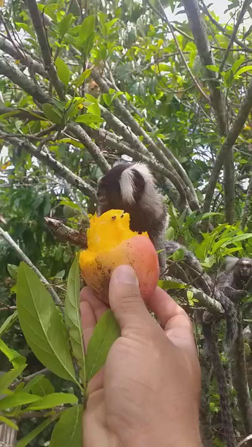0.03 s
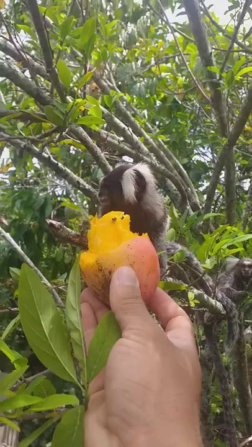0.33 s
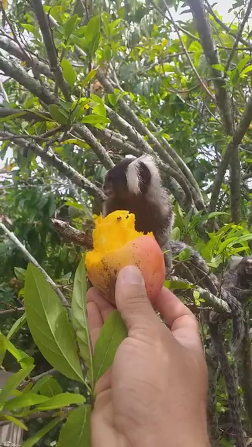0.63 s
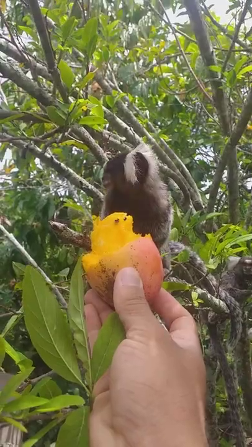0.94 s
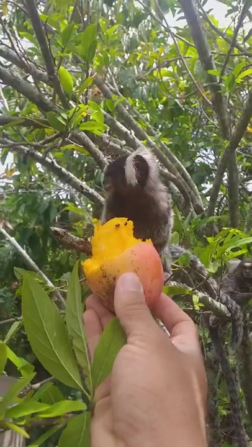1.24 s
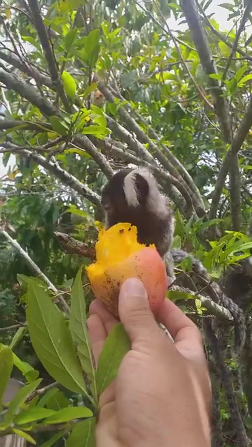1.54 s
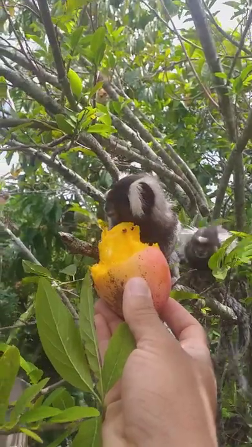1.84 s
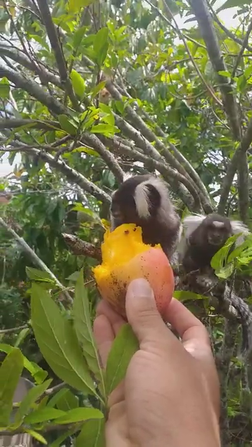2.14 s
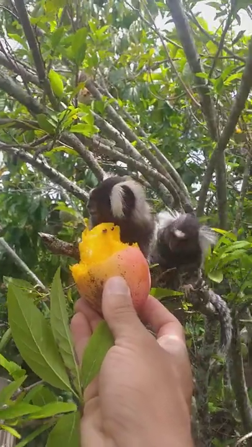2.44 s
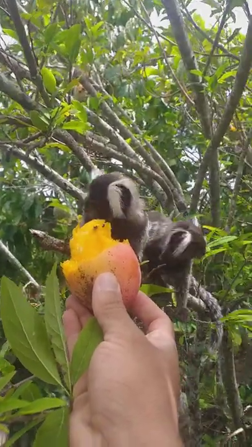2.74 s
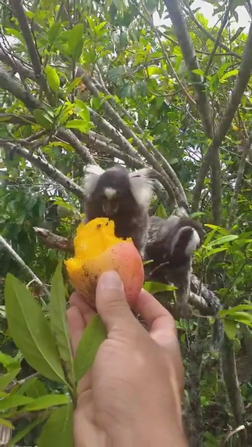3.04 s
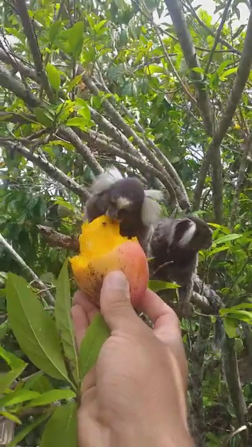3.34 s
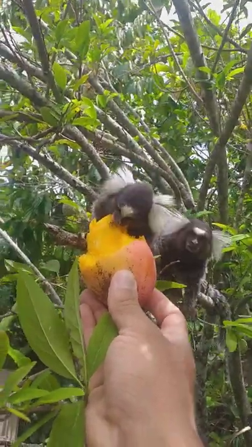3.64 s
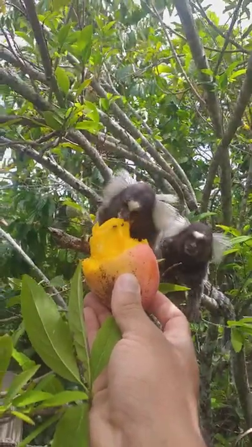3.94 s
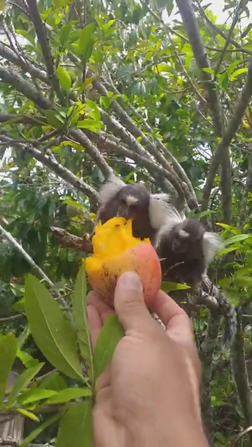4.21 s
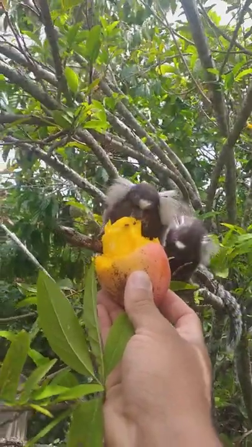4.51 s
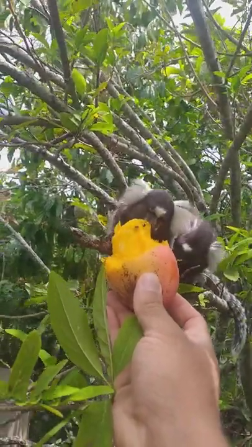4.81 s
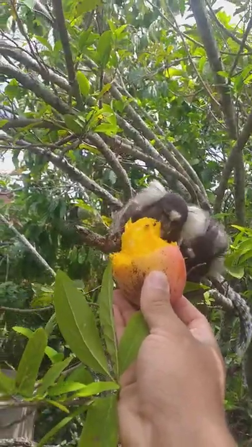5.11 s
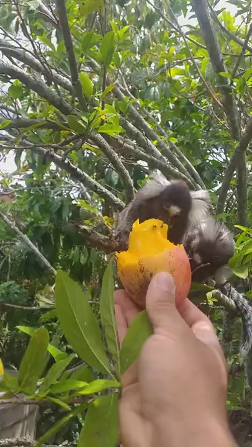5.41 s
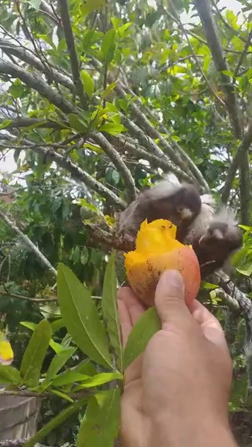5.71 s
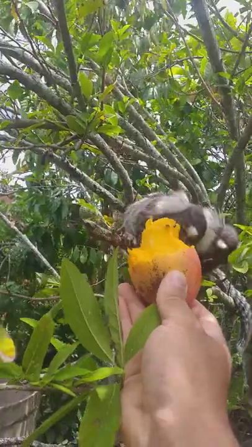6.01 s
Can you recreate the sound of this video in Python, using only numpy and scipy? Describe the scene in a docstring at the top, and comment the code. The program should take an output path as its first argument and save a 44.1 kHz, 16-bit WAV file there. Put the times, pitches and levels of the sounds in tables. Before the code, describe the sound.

Outdoors among leaves, bright, sizzling cicada pulses sound near the microphone, then give way to a brief low rumble of wind on it. Slightly duller buzzing pulses follow from a more distant cicada, about two a second. Over them come three quiet, very high trills from small monkeys. Soft garden air, far insects, tiny twig ticks and faint birds fill the background.

```python
"""Cicadas buzz in rasping pulses in a garden tree: one close by, then one farther off.
Each clicks two ribbed drums (tymbals) hundreds of times a second, and its hollow belly rings.
Between their turns, a gust of wind buffets the microphone. Marmosets (small monkeys) give three
thin, warbling trills. Twigs tick and birds peep faintly over a distant chorus of insects."""
import sys
import numpy as np
from scipy import signal
from scipy.fft import rfft, irfft
from scipy.io import wavfile
from scipy.ndimage import uniform_filter1d

SR = 44100
rng = np.random.default_rng(int(sys.argv[2]) if len(sys.argv) > 2 else 0)


def generate_wav(signal):
    """Clip the signal to [-1, 1] and save it as 16-bit WAV at the path in sys.argv[1]."""
    frames = np.transpose(np.atleast_2d(signal))
    scaled = np.clip(frames, -1, 1) * 32767
    pcm = np.round(scaled).astype(np.int16)
    wavfile.write(sys.argv[1], SR, pcm)


N = 276066
TIME = np.arange(N) / SR
HZ = np.fft.rfftfreq(N, 1 / SR)

# Levels in the tables are relative. A "colour" says how strong the low and high parts of a sound are.
# colours of the garden air, the insect chorus and the wind: frequency_hz, level_db
AIR_COLOUR = [(20, -50), (32, -25), (45, -8), (70, -14), (125, 0.5), (180, -9), (300, -10), (430, -11),
              (600, -8), (1000, -11.5), (1350, -14.5), (1850, -14.5), (2600, -18), (3400, -67)]
CHORUS_COLOUR = [(1800, -24), (2600, -17.5), (3150, -9.5), (3750, -4), (4100, -1), (5000, -2), (5800, -10),
                 (7000, -21.5), (8200, -37.5), (9500, -37), (11700, -27.5), (15700, -27.5)]
WIND_COLOUR = [(20, -55), (31, -26), (40, -17), (60, 0), (80, 4), (125, 0.5), (180, -5), (260, -18.5),
               (340, -20), (480, -38), (900, -82)]
# how those three grow louder and softer: time_s, level_db
AIR_LEVELS = [(0, -2), (.6, 0.1), (1.3, 0.6), (2, -0.5), (2.8, 1.2), (3.3, -0.4), (4.5, 0.6), (5.2, 0),
              (5.7, 2), (6.26, 1.7)]
CHORUS_LEVELS = [(0, -54), (.85, -51.5), (1.3, -50.5), (1.45, -49.5), (1.9, -49.5), (2.3, -51),
                 (2.6, -50.5), (2.85, -52), (3.4, -50.5), (3.85, -51.5), (3.98, -51), (4.1, -50),
                 (4.46, -50), (4.55, -51), (4.97, -52.5), (5.6, -50.5), (6.1, -50)]
WIND_LEVELS = [(0, -62), (1.15, -60.5), (1.58, -54), (1.85, -46), (2.03, -44.5), (2.09, -51.5), (2.16, -35),
               (2.4, -36), (2.45, -56), (2.49, -38.5), (2.7, -41.5), (2.8, -37.5), (3.02, -47.5),
               (3.07, -56), (3.3, -66), (4.0, -57), (4.3, -65.5), (6.26, -68)]
# far-off bird notes: start_s, pitch_hz, level_db, length_s
BIRD_NOTES = [(1.78, 1840, -71, 0.082), (2.56, 5700, -52, 0.029), (2.8, 1814, -59, 0.055),
              (4.95, 1962, -58, 0.045)]
# twigs ticking: start_s, level_db
TWIG_TICKS = [(1.7243, -36), (2.0068, -49), (2.0601, -52), (3.9674, -50), (4.449, -50)]
# the hardest shoves of wind: time_s, peak_db, pitch_hz
WIND_BUFFETS = [(.125, -43, 170), (1.625, -37, 108), (1.886, -27.5, 142), (1.999, -31.5, 124),
                (2.047, -31, 146), (2.27, -36, 140), (2.343, -26.5, 119), (2.54, -29.5, 145),
                (2.782, -29, 88)]
# marmoset calls: start_s, length_s, first_pitch_hz, last_pitch_hz, dip_hz, upward_swing_hz, level_db
MARMOSET_TRILLS = [(3.571, 0.245, 9170, 8000, -130, 1090, -56), (4.778, 0.27, 9650, 9300, 300, 2230, -52),
                   (5.795, 0.407, 9630, 9550, 568, 2158, -51)]
# the course of every trill: share_of_length, share_of_swing, level_db
TRILL_COURSE = [(0, 0.07, 3), (.11, .25, -1), (.2, 1, 6), (.42, 1, 0.5), (.7, .88, 1.5), (.9, .45, 1),
                (1, .25, -2)]
# bursts of hard snaps at the height of a cicada pulse: start_s, level_db, full_force_s
SNAP_BURSTS = [(.323, -23, .005), (.637, -25, .012), (1.105, -27, .001), (1.121, -27.5, 0.0078)]
# each cicada's pulses: start_s, swell_s, release_after_s, level_db, clicks_per_s, evenness_0_to_1
NEAR_PULSES = [(-.12, .16, 0.22, -39, 330, 0.29), (.125, 0.15, 0.24, -37, 362, 0.76),
               (.487, 0.19, 0.24, -35.8, 345, .76), (.909, .13, 0.2, -36.5, 368, .75),
               (1.459, .11, .19, -36.5, 435, 0.56)]
FAR_PULSES = [(2.93, 0.18, .25, -44.5, 331.2, 0.98), (3.505, 0.26, 0.22, -37, 358.8, 0.46),
              (4.095, .15, 0.19, -36.5, 339.6, 0.36), (4.565, 0.28, 0.27, -36, 379.6, 0.19),
              (5.11, 0.19, 0.25, -36, 375.5, .3), (5.66, 0.2, 0.22, -34.8, 400.4, 0.11),
              (6.164, .14, .21, -37, 415, .36)]
# each cicada's colour: frequency_hz, level_db
NEAR_BUZZ_COLOUR = [(1200, -46), (1950, -29), (2350, -26), (3050, -9.5), (3600, -3.5), (4150, 4.5),
                    (5300, -6), (6100, -13.5), (6800, -18.5), (7600, -40.5), (10800, -26.5), (12300, -13),
                    (15200, -9), (16000, -18.5)]
FAR_BUZZ_COLOUR = [(1200, -32.5), (2000, -22.5), (2500, -24), (2900, -13.5), (3550, -3), (4150, 3),
                   (4700, -6), (5700, -14.5), (6700, -25.5), (7800, -45.5), (9500, -48.5), (11500, -28),
                   (13500, -29), (16000, -34)]
# how body, rasp and sizzle (a row each) follow a pulse: full_db, fade_in_s, shortfall_db, fall_db_per_s
NEAR_BANDS = [(-0.9, 0.025, 11, 234), (-0.4, 0.039, 25, 225), (-5, 0.048, 25, 278)]
FAR_BANDS = [(-1, 0.043, 14.4, 163), (-3.5, 0.092, 26.5, 160), (-15, .11, 27, 175)]

WARBLES_PER_S, EXTRA_WARBLES_PER_S, SETTLE_S = 27.7, 5, .1  # a trill starts fast, then settles
SNAPS_PER_S, BURST_S = 310, .055
SNAP_FADE_DB, SNAP_FADE_S = -19.5, 0.0089  # how far and how fast the snaps weaken
SNAP_DROP_HZ, SNAP_DROP_S = 1100, 0.026  # a burst's low note starts this much higher and sinks
LOCK_S = .18  # time into a pulse when the drums beat most evenly
SWELL_CURVE = 2.27  # a pulse swells quickly at first, then flattens
RELEASE_S = 0.0068  # how softly a pulse turns into its fall
BODY_HZ = 4090  # main note of a cicada's hollow belly


def gain_of(db):
    """Turns decibels into a number to multiply by."""
    return 10 ** (np.asarray(db) / 20)


def evened(x):
    """Scales a signal to an average strength (rms) of 1."""
    return x / np.sqrt(np.mean(x ** 2) + 1e-20)


def steadied(x, size):
    """Holds the strength near 1 over stretches of size samples."""
    return x / np.sqrt(abs(uniform_filter1d(uniform_filter1d(x ** 2, size), size)) + 1e-12)


def add(mix, start_s, sound):
    """Mixes a sound in at the given time."""
    part = mix[max(round(start_s * SR), 0):][:len(sound)]
    part += sound[:len(part)]


def follow(rows, t=TIME):
    """Joins a table's rows with straight lines and reads each column at t."""
    times, *columns = np.transpose(rows)
    return [np.interp(t, times, column) for column in columns]


def coloured(x, colour):
    """Gives a sound a colour, at a strength of 1."""
    hz, db = np.transpose(colour)
    gains = gain_of(np.interp(np.log(HZ + 1), np.log(hz), db))
    return evened(irfft(rfft(x) * gains, N))


def drift(rate_hz):
    """A slow random wander, at a strength of 1."""
    return evened(irfft(rfft(rng.standard_normal(N)) * np.exp(-(HZ / rate_hz) ** 2), N))


def cut_lows(x, hz, order):
    """Weakens everything below hz; a higher order cuts more sharply."""
    return signal.sosfilt(signal.butter(order, hz, "highpass", fs=SR, output="sos"), x)


def resonate(x, hz, width_hz):
    """Makes a sound ring around one pitch, which may glide."""
    turn = np.exp(2j * np.pi * np.cumsum(hz * np.ones(N)) / SR)
    decay = np.exp(-np.pi * width_hz / SR)
    return (turn * signal.lfilter([(1 - decay) ** 2], [1, -2 * decay, decay * decay], x / turn)).real


def foliage(x, echo_db, fade_s):
    """Adds tiny echoes from leaves and branches, which fall by 60 dB in fade_s."""
    t = np.arange(SR // 4) / SR
    echoes = rng.standard_normal(len(t)) * (rng.random(len(t)) < .1)
    echoes *= gain_of(-60 * t / fade_s) * (t > .001)
    return x + gain_of(echo_db) * signal.oaconvolve(x, echoes / np.linalg.norm(echoes))[:N]


def garden():
    """The low murmur of outdoor air and the shimmer of many distant insects."""
    air = coloured(rng.standard_normal(N), AIR_COLOUR)
    air *= gain_of(-56 + follow(AIR_LEVELS)[0] + .5 * drift(24.0))
    chorus = coloured(foliage(rng.standard_normal(N), echo_db=-6.5, fade_s=0.024), CHORUS_COLOUR)
    return air + chorus * gain_of(follow(CHORUS_LEVELS)[0] + 1.1 * drift(2.3))


def birds():
    """Soft, short whistles from far away."""
    out = np.zeros(N)
    for start, hz, db, length in BIRD_NOTES:
        t = np.arange(0, length, 1 / SR)
        add(out, start, gain_of(db) * np.hanning(len(t)) * np.sin(2 * np.pi * hz * t))
    return foliage(out, echo_db=-3, fade_s=.2)


def twigs(gain_db, fade_s):
    """Tiny dry ticks: bright noise that dies at once."""
    t, out = np.arange(700) / SR, np.zeros(N)
    for start, db in TWIG_TICKS:
        bright_noise = np.diff(rng.standard_normal(len(t) + 1))
        add(out, start, gain_of(db + gain_db - 60 * t / fade_s) * bright_noise)
    return out


def wind():
    """Swirling air rumbles on the microphone; each buffet is one pull and push."""
    level_db = follow(WIND_LEVELS)[0] + 2.5 * drift(12.4)
    out = gain_of(level_db) * steadied(coloured(rng.standard_normal(N), WIND_COLOUR), size=1500)
    t = np.arange(-1024, 1024) / SR
    for middle, db, hz in WIND_BUFFETS:
        angle = 2 * np.pi * hz * t
        add(out, middle + t[0], gain_of(db) * angle * np.exp((1 - angle ** 2) / 2))
    return out


def trill(length, first_hz, last_hz, dip_hz, swing_hz, db):
    """A warbling whistle: its pitch rises to pointed crests, and the voice breaks after wide ones."""
    t = np.arange(0, length, 1 / SR)
    along = t / length
    width, shape_db = follow(TRILL_COURSE, along)
    low_hz = first_hz + (last_hz - first_hz) * along - dip_hz * np.sin(np.pi * along ** .75) ** 2
    angle = np.pi * np.cumsum(WARBLES_PER_S + EXTRA_WARBLES_PER_S * np.exp(-t / SETTLE_S)) / SR
    trough = np.sin(angle) ** 2
    crest = (1 - trough) / (1 + 1.5 * trough)
    shake = evened(uniform_filter1d(rng.standard_normal(SR), size=220))[:len(t)]
    flutter = evened(uniform_filter1d(rng.standard_normal(SR), size=220))[:len(t)]
    hz = (low_hz + swing_hz * width * crest) * (1 + .006 * shake)
    voice_break = np.exp(-(np.sin(angle - .25) / 0.36) ** 2) * width ** 2
    level_db = db + shape_db + 6 * crest - 22 * voice_break + 2.1 * flutter
    whistle = np.sqrt(2) * np.sin(2 * np.pi * np.cumsum(hz) / SR)
    return whistle * gain_of(level_db) * signal.windows.tukey(len(t), .04)


def marmosets():
    """Small monkeys keep in touch with three trills among the leaves."""
    out = np.zeros(N)
    for start, *call in MARMOSET_TRILLS:
        add(out, start, trill(*call))
    return gain_of(-9.5) * foliage(out, echo_db=-9, fade_s=0.16)


def cicada_snaps(low_hz, high_hz, low_fade_s, high_fade_s, high_db):
    """Hard drum snaps ring two notes of the body; through a burst they weaken and the low note sinks."""
    t, out = np.arange(512) / SR, np.zeros(N)
    fade_in = 1 - np.exp(-t / 0.00028)
    for start, db, hold in SNAP_BURSTS:
        for age, slip in zip(np.arange(0, BURST_S, 1 / SNAPS_PER_S), rng.random(size=64)):
            sinking_hz = low_hz + SNAP_DROP_HZ * np.exp(-age / SNAP_DROP_S)
            low = np.sin(2 * np.pi * sinking_hz * t) * gain_of(-60 * t / low_fade_s)
            high = np.sin(2 * np.pi * high_hz * t) * gain_of(high_db - 60 * t / high_fade_s)
            force_db = db + SNAP_FADE_DB * (1 - np.exp(-max(age - hold, 0) / SNAP_FADE_S))
            add(out, start + age + .3 * slip / SNAPS_PER_S, gain_of(force_db) * (low - high) * fade_in)
    return gain_of(2.5) * foliage(cut_lows(out, hz=1300, order=2), echo_db=-0.5, fade_s=0.15)


def tymbals(pulses, lock_width_s, ring_s, scrape, uneven_db):
    """Two ribbed drums buckle in turn; their ragged clicks grow more even partway into each pulse."""
    starts, _, _, _, rates, evenness = np.transpose(pulses)
    locks = starts + LOCK_S
    rate = np.interp(TIME, locks, rates)
    even = sum(peak * np.exp(-((TIME - lock) / lock_width_s) ** 2) for lock, peak in zip(locks, evenness))
    even = np.clip(even, 0, 1)
    click_count = np.cumsum(rate * (1 + .007 * drift(20))) / SR
    hits = np.flatnonzero(np.diff(np.floor(click_count)))
    slip = .25 * (1 - even[hits]) ** 3 * rng.standard_normal(N)[hits] * SR / rate[hits]
    hits = np.clip(hits + np.round(slip).astype(int), 0, N - 1)
    force = gain_of(uneven_db * rng.standard_normal(N)[hits])
    fade = np.exp(-np.arange(256) / SR / ring_s)
    clicks, rasp = np.zeros(N), np.zeros(N)
    for side in range(2):
        strokes = np.bincount(hits[side::2], force[side::2], N)
        # each drum has its own run of ribs, the same at every stroke
        ribs = rfft(fade * rng.standard_normal(len(fade)))
        click = irfft(ribs / abs(ribs)) * np.sqrt(fade)
        clicks += np.convolve(strokes, click)[:N]
        rasp += np.convolve(strokes, fade)[:N]
    return evened(clicks) + scrape * (1.3 - even) * evened(rasp * rng.standard_normal(N))


def pulse_loudness(pulses, full_db, fade_in_s, shortfall_db, fall_db_per_s):
    """Each pulse swells towards full effort and dies away after its release."""
    t, power = np.arange(SR) / SR, np.zeros(N + 2 * SR)
    fade_in = np.sin(np.pi / 2 * np.minimum(t / fade_in_s, 1)) ** 2
    for start, swell, release, db, _, _ in pulses:
        swell_db = shortfall_db * np.maximum(1 - t / swell, 0) ** SWELL_CURVE
        fall_db = fall_db_per_s * RELEASE_S * np.logaddexp(0, (t - release) / RELEASE_S)
        # one spare second lets a pulse begin before time zero
        add(power, start + 1, (fade_in * gain_of(db + full_db - swell_db - fall_db)) ** 2)
    return np.sqrt(power[SR:SR + N])


def cicada(clicks, pulses, colour, bands, whistle_width_hz, slide_hz, slide_db):
    """Clicks ring the hollow belly: each pulse starts as a whistle, then opens into rasp and sizzle."""
    starts = np.array(pulses)[:, 0]
    age = abs(TIME - starts[np.searchsorted(starts, TIME) - 1])
    spectrum = rfft(coloured(clicks, colour))
    above_body, above_rasp = (1 / (1 + (hz / (HZ + 1)) ** 30) for hz in (4600, 8500))
    body = irfft(spectrum * (1 - above_body), N)
    rasp = irfft(spectrum * (above_body - above_rasp), N)
    sizzle = irfft(spectrum * above_rasp, N)
    early = uniform_filter1d(np.exp(-(age / 0.07) ** 2), size=1300)
    whistle = evened(resonate(clicks, BODY_HZ, whistle_width_hz))
    # the belly stretches during a pulse: its lower note slides down, then fades
    slack = uniform_filter1d(np.exp(-(age / 0.08) ** 1.7), size=1300)
    held = uniform_filter1d(np.exp(-(age / 0.56) ** 4), size=1300)
    bright_clicks = cut_lows(clicks, hz=2150, order=12)
    slide = evened(resonate(bright_clicks, slide_hz + 1000 * slack, width_hz=890)) * held
    body = (1 - early) * evened(body) + early * whistle + gain_of(slide_db) * slide * (1 - 0.05 * early)
    return sum(steadied(sound, size=900) * pulse_loudness(pulses, *band)
               for sound, band in zip((body, rasp, sizzle), bands))


def scene():
    """Both cicadas, the monkeys and the garden around them."""
    near_clicks = tymbals(NEAR_PULSES, lock_width_s=.07, ring_s=0.00169, scrape=0.82, uneven_db=1.5)
    near_clicks = foliage(near_clicks, echo_db=7, fade_s=0.13)
    far_clicks = tymbals(FAR_PULSES, lock_width_s=0.076, ring_s=0.0019, scrape=1.0, uneven_db=2.0)
    far_clicks = foliage(far_clicks, echo_db=1.5, fade_s=0.33)
    near = cicada(near_clicks, NEAR_PULSES, NEAR_BUZZ_COLOUR, NEAR_BANDS,
                  whistle_width_hz=620, slide_hz=2290, slide_db=-12)
    far = cicada(far_clicks, FAR_PULSES, FAR_BUZZ_COLOUR, FAR_BANDS,
                 whistle_width_hz=790, slide_hz=2310, slide_db=-16.5)
    cicadas = foliage(near + far, echo_db=-22.5, fade_s=0.62)
    snaps = cicada_snaps(low_hz=1410, high_hz=3540, low_fade_s=0.0044, high_fade_s=0.0025, high_db=-1.5)
    mix = cicadas + snaps + marmosets() + wind() + twigs(gain_db=-13, fade_s=.012) + birds() + garden()
    return mix[None]


def record(dry):
    """After a moment of silence the sound starts; the microphone loses deep bass and the very top."""
    fade_in = np.clip((TIME - .069) * 1000, 0, 1)
    live = cut_lows(dry * fade_in, hz=45, order=4)
    cut_highs = signal.firwin(511, cutoff=15800, window=("kaiser", 9), fs=SR)
    return signal.oaconvolve(live, cut_highs[None], "same")


dry = scene()
out = record(dry)
generate_wav(out)
```